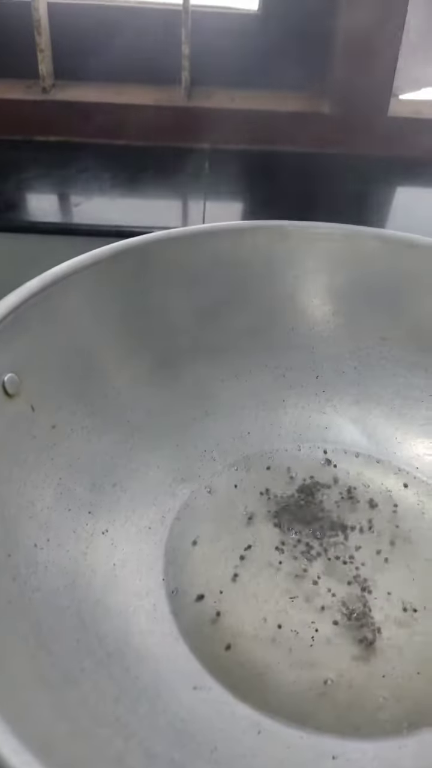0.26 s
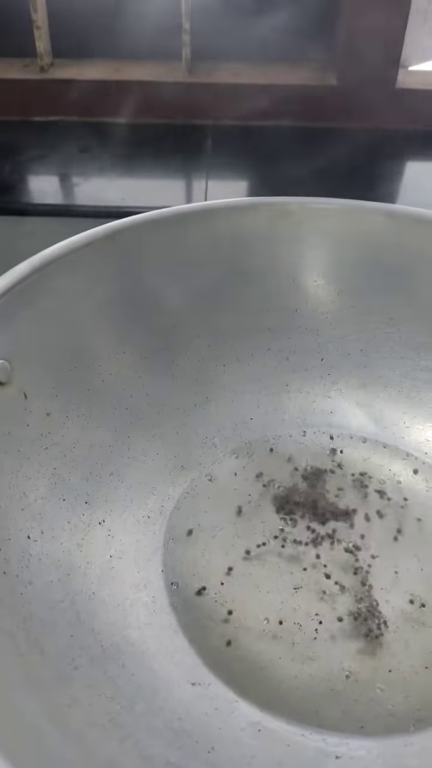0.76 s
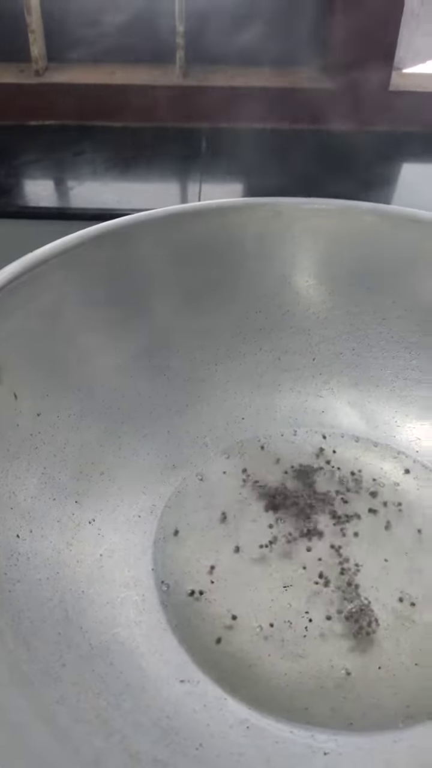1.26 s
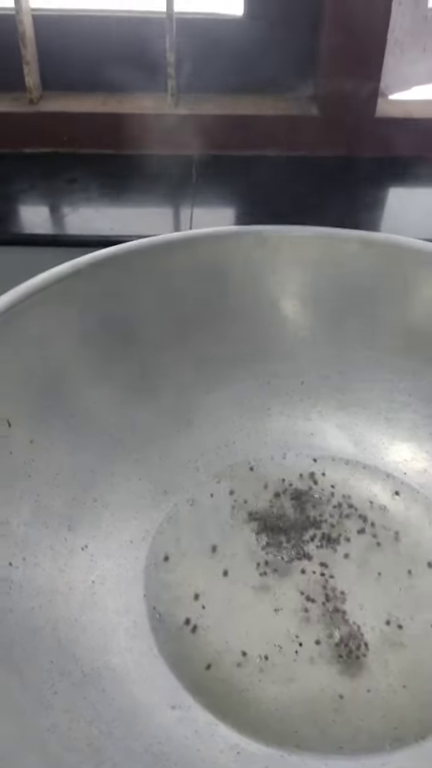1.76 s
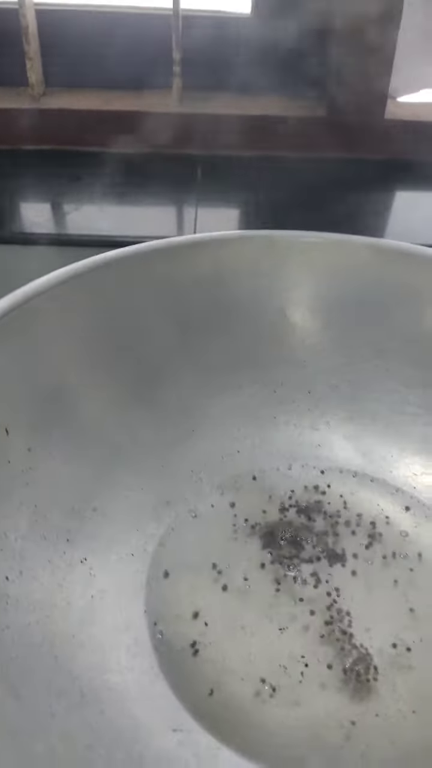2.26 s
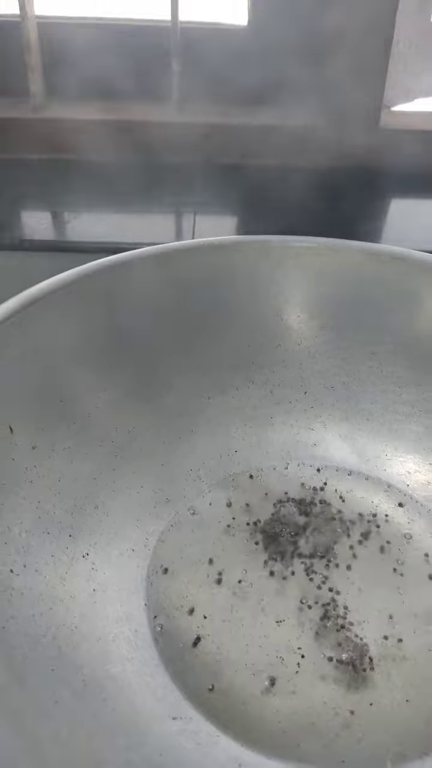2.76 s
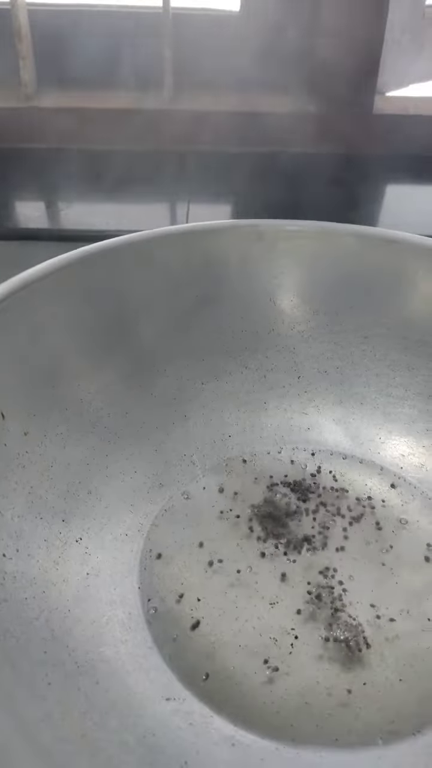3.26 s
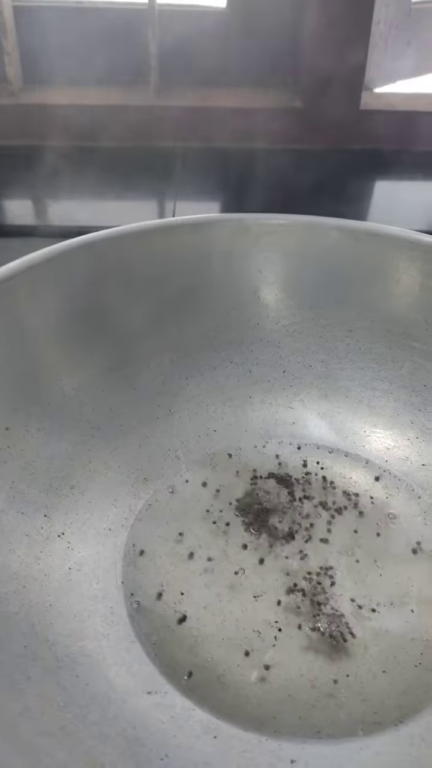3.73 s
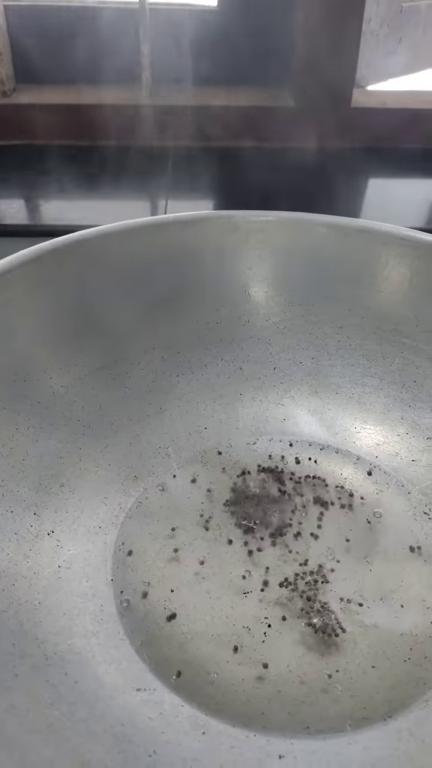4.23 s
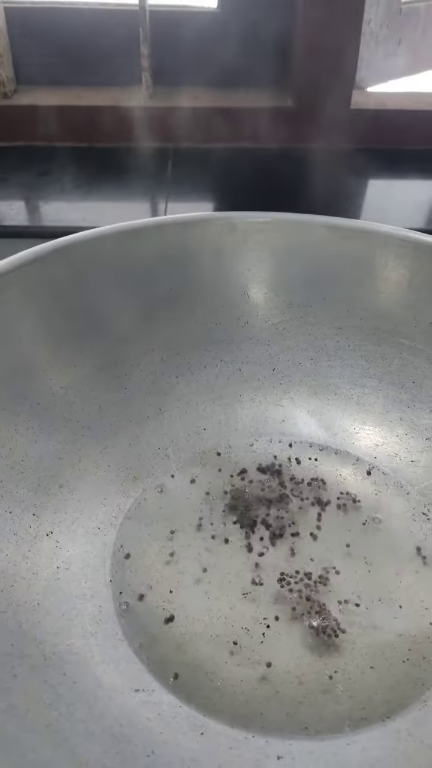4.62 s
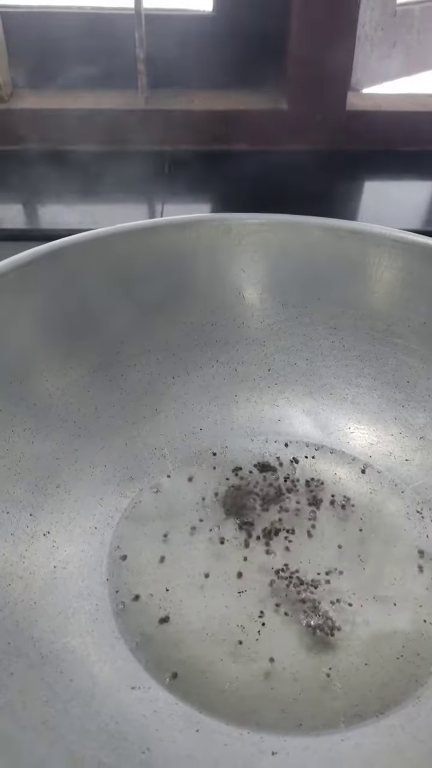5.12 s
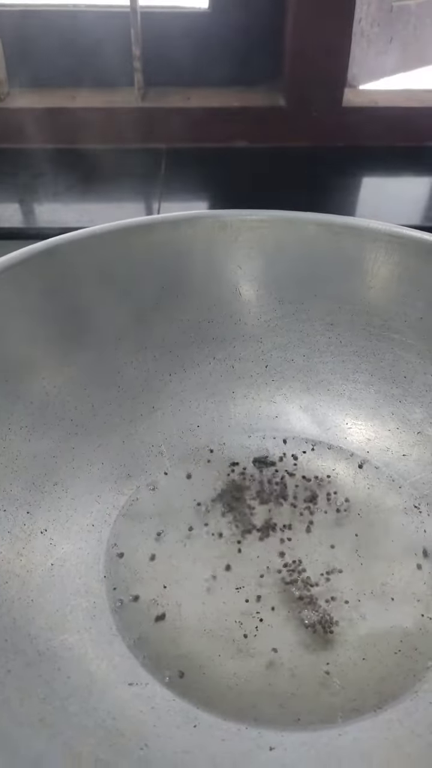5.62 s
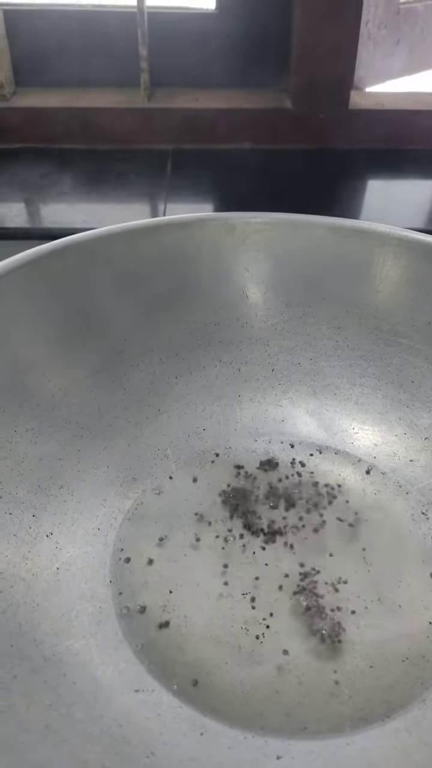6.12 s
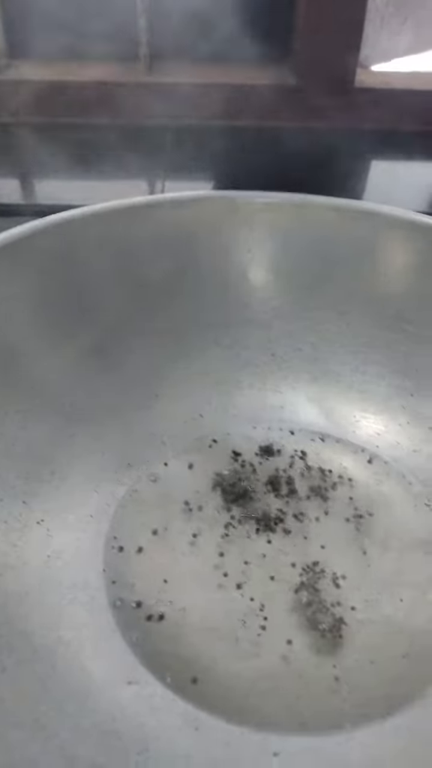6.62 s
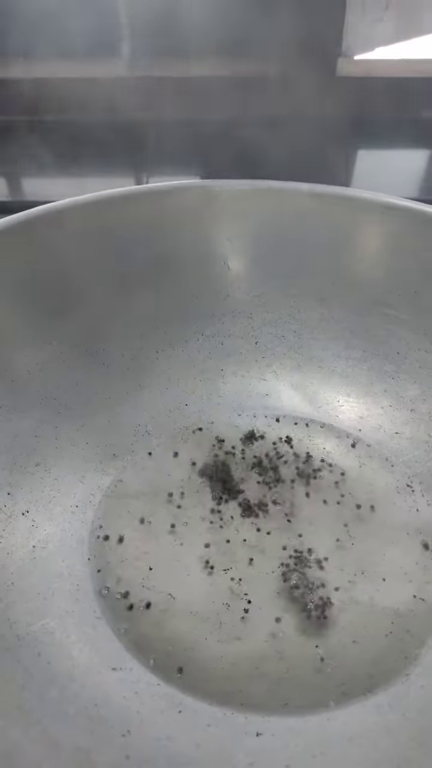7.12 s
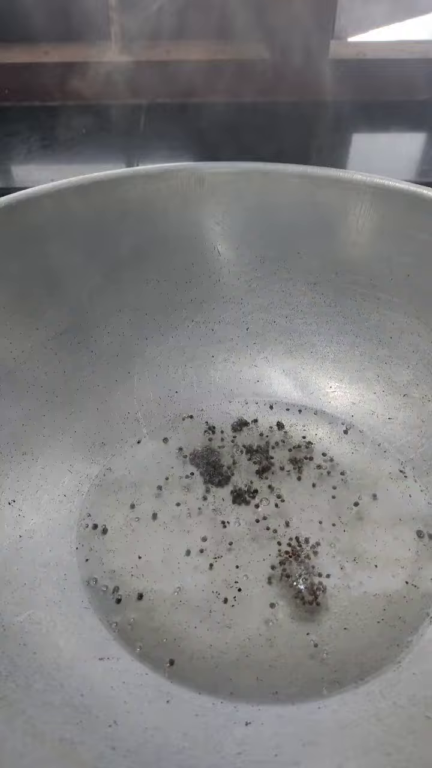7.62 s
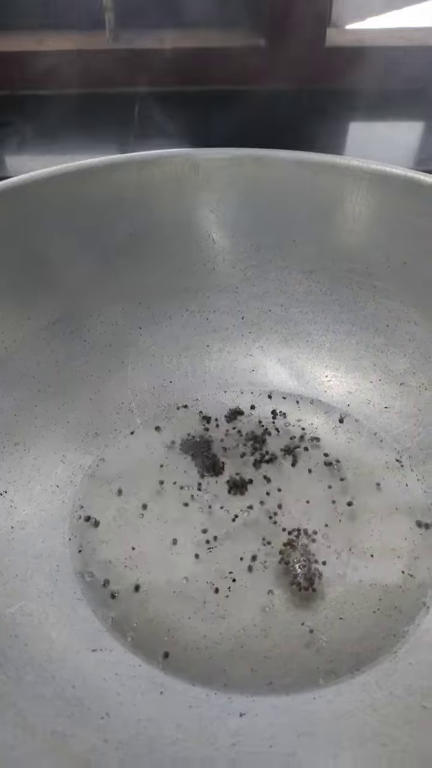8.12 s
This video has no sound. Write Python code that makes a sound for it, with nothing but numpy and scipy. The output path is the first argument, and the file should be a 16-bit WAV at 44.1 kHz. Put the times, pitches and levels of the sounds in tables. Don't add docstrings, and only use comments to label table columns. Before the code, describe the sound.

A quiet gas flame hisses and rumbles while seeds burst in a little hot oil. Dry, bright snaps jump out far above the background, some doubled, some with duller pan knocks, brief steam puffs or fine sizzling sprays. The metal bowl scatters and briefly rings with each crack. After about six and a half seconds the pops thin out, ending with a strong late one. Close stereo phone pickup in a small hard room.

```python
import sys
import numpy as np
from scipy import signal
from scipy.fft import rfft, irfft, next_fast_len
from scipy.io import wavfile
from scipy.ndimage import uniform_filter1d, minimum_filter1d, map_coordinates

SR = 44100
rng = np.random.default_rng(int(sys.argv[2]) if len(sys.argv) > 2 else 0)


def output_pcm(signal):
    pcm = np.clip(np.atleast_2d(signal).T, -1, 1) * 32767
    wavfile.write(sys.argv[1], SR, np.round(pcm).astype(np.int16))


def how_loud(loudness_db):
    steps = np.asarray(loudness_db, float) / 20
    return 10 ** steps


N = 369558

# (frequency [Hz], level per Hz [dB])
SNAP = [(3500, -44), (5200, -3), (6500, -2.5), (7800, 2), (9200, -7), (9700, -19.5), (10300, -27.5),
        (15000, -32.5), (16500, -73.5)]
# (frequency [Hz], level per Hz [dB])
BODY = [(2500, -38), (3500, -4), (4400, 3), (5300, 3.5), (6200, -9), (8000, -47.5)]


def unit(x):
    return x / np.sqrt(np.mean(x ** 2) + 1e-20)


def along(points, hz):
    f, v = np.transpose(points)
    return np.interp(np.log(hz + 1), np.log(f + 1), v)


def wobble(rate):
    knots = rng.standard_normal(int(N * rate / SR) + 4)
    return map_coordinates(knots, [np.arange(N) * rate / SR])


def filtered(x, response):
    m = next_fast_len(x.shape[-1] + 8192)
    return irfft(rfft(x, m) * response(np.fft.rfftfreq(m, 1 / SR)), m)[..., :x.shape[-1]]


def causal(spectrum, size=1024):
    log_gain = np.log(how_loud(along(spectrum, np.fft.rfftfreq(size, 1 / SR))) + 1e-6)
    c = irfft(log_gain, size)
    c = np.concatenate([c[:1], 2 * c[1:size // 2], np.zeros(size // 2)])
    h = irfft(np.exp(rfft(c)), size)[:size // 2]
    return h / np.linalg.norm(h)


def noise_pair(count):
    return rng.standard_normal((2, count))


def bursts():
    # (time [s], snap level [dB], belly beside snap [dB], body beside snap [dB])
    deep_seeds = [(-.06, -9.5, -16.5, -9), (0.1654, -7, -14, -9), (.19, -7.5, -13, -9),
                  (.611, -10, -14, -8.5), (0.9386, -6.5, -12, -7.5), (0.9782, -10, -17, -12.5),
                  (1.066, -4, -18, -8), (1.299, -13.5, -19, -14), (1.3422, -9.5, -10, -12),
                  (2.6652, -5.5, -18.5, -14.5), (2.7581, -6.5, -12.5, -10.5), (3.454, -5.5, -19.5, -10.5),
                  (3.5792, -4, -15, -11.5), (4.1491, -9.5, -11.5, -6), (4.6823, -11, -8, -5.5),
                  (4.9854, -9.5, -16.5, -8), (5.385, -7, -15, -11), (5.4789, -27.5, -17, -10),
                  (5.8074, -6.5, -15, -15.5), (5.895, -5.5, -14.5, -14.5), (6.0996, -5, -21, -15.5),
                  (6.548, -7, -18.5, -13), (6.6262, -5.5, -16, -11.5), (7.0113, -4, -19, -16)]
    # (time [s], snap level [dB], bowl beside snap [dB], body beside snap [dB])
    shallow_seeds = [(0.0433, -15.5, -9, -17), (1.3155, -6, -12.5, -11.5), (1.5047, -6.5, -13, -11),
                     (1.577, -5.5, -16.5, -12.5), (2.003, -8.5, -13, -9.5), (2.1143, -8.5, -8.5, -9.5),
                     (2.1915, -3.5, -16.5, -13.5), (2.3457, -16.5, -19.5, -4.5), (2.4654, -6, -19.5, -9),
                     (2.614, -13, -11, -1.5), (2.658, -16, -10.5, -9), (3.3877, -19.5, -15.5, -6),
                     (3.729, -7.5, -14, -8), (3.9059, -6.5, -13.5, -11), (4.0327, -7.5, -12, -9.5),
                     (4.1163, -6.5, -16.5, -10.5), (5.109, -35.5, -8, 2.5), (5.3422, -9, -13.5, -6.5),
                     (5.5522, -6, -13, -13), (6.5385, -21.5, -12, -12), (7.867, -3, -16, -11)]
    # (time [s], snap level [dB], body beside snap [dB], left over right [dB])
    air_seeds = [
        (0.0459, -6, -6.5, 2),
        (0.8744, -30.5, -16, -10),
        (1.9133, -6.5, -9.5, -1.5),
        (4.1716, -6.5, -19.5, 6),
        (4.464, -7, -9.5, 1.5),
        (4.5055, -10, -10.5, 5),
        (6.417, -28.5, -17, 6),
        (7.776, -16, -14, 0),
    ]
    deep_bowl_db, shallow_belly_db = -4.5, -9
    air_belly_db, air_bowl_db = -31, -27
    left_db = 1.2
    deep = [(s, db, belly, body + deep_bowl_db, body, left_db) for s, db, belly, body in deep_seeds]
    shallow = [(s, db, bowl + shallow_belly_db, bowl, body, left_db) for s, db, bowl, body in shallow_seeds]
    air = [(s, db, air_belly_db, air_bowl_db, body, left) for s, db, body, left in air_seeds]
    return sorted(deep + shallow + air)


def drone():
    # (frequency [Hz], width [Hz], level [dB])
    motor_tones = [(213.7, 6.2, -68), (246, 9, -66), (327, 11, -66), (922, 54, -68)]
    total = 0
    for centre, width, db in motor_tones:
        tone = filtered(rng.standard_normal(N), lambda hz: 1 / (1 + ((hz - centre) / width * 2) ** 2))
        total = total + how_loud(db) * unit(tone)
    return total


def rush(spectrum, patchy_db):
    # (frequency [Hz], likeness [-1 to 1])
    likeness = [(60, 0.64), (180, 0.81), (550, 0.08), (1650, -0.33), (4970, 0.13), (15000, -0.13)]
    z = signal.stft(noise_pair(N), nperseg=512)[2]
    field = uniform_filter1d(rng.standard_normal(z.shape[1:]), 6, 0)
    field = uniform_filter1d(field, 10, 1)
    pair = signal.istft(z * how_loud(patchy_db * unit(field)), nperseg=512)[1][:, :N]

    def spread(hz):
        turn = np.arccos(np.clip(along(likeness, hz), -1, 1)) / 2
        return how_loud(along(spectrum, hz)) * [np.cos(turn), np.sin(turn)]

    mid, side = filtered(pair, spread)
    return unit(np.array([mid + side, mid - side]))


def flame():
    # (frequency [Hz], level per Hz [dB])
    hiss_colour = [(650, -3.5), (1100, -11), (1560, -13), (1690, -11.5), (1770, -13), (3160, -14),
                   (4280, -9), (5560, -7), (7810, 4), (11200, -18), (14700, -22), (15900, -30),
                   (16500, -46)]
    # (frequency [Hz], level per Hz [dB])
    rumble_colour = [(12, -42), (20, 14), (43, 1), (91, -9.5), (160, -15), (202, 1.5), (288, -19.5),
                     (418, -1.5), (449, -25), (473, -17.5), (700, -7.5), (851, -21), (930, -5.5),
                     (1030, -11.5), (1400, -29), (1820, -22), (3080, -120)]
    calm_db, stir_db, settle_s, sag_db_per_s, rumble_db = -47.5, 1.3, 0.28, 0.12, -51.5
    t = np.arange(N) / SR
    stir = sum(how_loud(p[1] + 4.5) * np.exp(-np.abs(t - p[0]) / settle_s) * (t > p[0]) for p in bursts())
    hiss_db = calm_db + stir_db * uniform_filter1d(stir, SR // 10) - sag_db_per_s * t
    hiss = how_loud(hiss_db + 6 + 1.23 * wobble(6)) * rush(hiss_colour, patchy_db=2.0)
    rumble = how_loud(rumble_db + 1.1 + 0.11 * wobble(1.7)) * rush(rumble_colour, patchy_db=-0.1)
    return hiss + rumble


def extras():
    # (end time [s], level [dB], rise by 60 dB [s])
    vents = [
        (1.299, -34, 0.11),
        (2.194, -37, .03),
        (4.116, -32, .025),
        (4.173, -7.5, 0.019),
        (4.507, -23, 0.024),
        (7.009, -43, 0.034),
        (0.167, -27, .02),
    ]
    # (time [s], level [dB])
    splinters = [(0.979, -21), (1.067, -19), (1.344, -2.5), (3.7298, -11), (3.907, -9), (4.0331, -5),
                 (4.1735, -16), (4.507, -6), (4.6841, -2.5), (4.9871, -4), (5.3418, -7), (6.551, -20)]
    # (time [s], peak level [dB])
    thumps = [
        (2.759, -43),
        (3.455, -40),
        (5.385, -37),
        (5.553, -37.5),
        (5.809, -33.5),
        (7.87, -37),
    ]
    # (frequency [Hz], level per Hz [dB])
    thud = [(80, -61), (220, 2), (500, 9), (900, 7.5), (1300, -16), (2500, -67)]
    bright, dull = np.zeros((2, N)), np.zeros((2, N))
    t = np.arange(SR // 10) / SR
    for s, db, t60 in vents:
        end = round(s * SR)
        bright[:, end - len(t):end] += how_loud(db - 60 * t[::-1] / t60) * noise_pair(len(t))
    for s, db in splinters:
        bright[[0, 1], round(s * SR) + np.array([9, 0])] += how_loud(db + 15)
    kicks = [(p[0], p[1] + p[2] - 19) for p in bursts()[1:]]
    for s, db in thumps + kicks:
        dull[:, round(s * SR):][:, :len(t)] += how_loud(db - 1.0 - 60 * t / 0.1) * noise_pair(len(t))
    splinter_colour = causal(SNAP) + 0.55 * causal(BODY)
    bright = signal.fftconvolve(bright, splinter_colour[None], axes=1)[:, :N]
    return bright + signal.fftconvolve(dull, causal(thud)[None], axes=1)[:, :N]


def sprays():
    # (time [s], peak level [dB])
    fine_sprays = [(0.044, -22), (.19, -46), (.9393, -41), (1.3149, -29), (2.7571, -22), (3.5793, -17.5),
                   (4.15, -30.5), (4.5186, -12), (5.806, -21), (5.8936, -20), (6.0983, -19.5), (7.011, -19),
                   (7.869, -21)]
    # (time [s], peak level [dB])
    droplets = [
        (1.5778, -37),
        (2.3448, -9.5),
        (3.454, -9.5),
        (3.9068, -0.5),
        (4.5057, 0),
        (5.3842, -20),
        (6.5495, -2),
    ]
    # (frequency [Hz], level per Hz [dB])
    spit_colour = [(7500, -13), (9800, 9.5), (12000, -0.5), (15000, -13), (15900, -25), (16600, -67)]
    spray_t60_s, spit_t60_s = 0.24, 0.011
    out, t = np.zeros((2, N + SR)), np.arange(SR // 5) / SR
    ticks = [(p[0], p[1] - 33 + rng.normal(0, 4)) for p in bursts()[1:]]
    events = [(*p, spray_t60_s) for p in fine_sprays] + [(*p, spit_t60_s) for p in droplets + ticks]
    for s, db, t60 in events:
        out[:, round(s * SR):][:, :len(t)] += how_loud(db - 10.5 - 60 * t / t60) * noise_pair(len(t))
    return signal.fftconvolve(out, causal(spit_colour)[None], axes=1)[:, :N]


def fizz(t, lead):
    rise = how_loud(rng.normal(-18, 4) - 60 * (lead - t) / .007)
    return noise_pair(len(t)) * (t < lead) * rise


def bounce(t, spike_db):
    glints = noise_pair(len(t)) * how_loud(spike_db * noise_pair(len(t)))
    fill = how_loud(-1.0) * (1 - np.exp(-t / 0.00038))
    direct = rng.standard_normal(len(t)) * how_loud(7.5 - 60 * t / 0.0041) * (1 - np.exp(-t / 0.00031))
    pair = np.array([np.roll(direct, 18), direct])
    flutter = how_loud(-60 * t / 0.038) + how_loud(-10.5 - 60 * t / .12)
    return pair + unit(glints) * fill * flutter


def kitchen(t):
    # (frequency [Hz], fall by 60 dB [s])
    echo_times = [(1000, 0.55), (2500, 0.58), (7000, 0.47), (14000, 0.37)]
    hz, s, z = signal.stft(noise_pair(len(t)), SR, nperseg=256)
    fade = how_loud(-60 * s / along(echo_times, hz)[:, None])
    tail = signal.istft(z * fade, SR, nperseg=256)[1][:, :len(t)]
    late = 1 + 0.36 / (1 + np.exp(-(t - .11) / 0.01))
    return tail * late * (1 - np.exp(-t / 0.013))


def ring(t, belly_db, bowl_db):
    # (frequency [Hz], level [dB], fall by 60 dB [s])
    wall_tones = [(786, -22, 0.2), (1480, -8.5, 0.19), (1692, -9.5, 0.34), (1626, -3, 0.22),
                  (1740, -41, 0.097), (1960, -28, 0.22), (2040, -7, 0.29), (2118, -5, 0.31),
                  (2474, -2.5, 0.21), (2600, -17, 0.1), (2960, -5.5, 0.25), (3044, -17, 0.4)]
    hz, db, t60 = np.transpose(wall_tones)[:, :, None]
    db = db + np.where(hz < 2250, belly_db, bowl_db) + 3 * rng.standard_normal((2, len(wall_tones), 1))
    detuned_hz = hz * (1 + 0.00785 * rng.standard_normal(hz.shape))
    turns = detuned_hz * t + rng.random((2, len(wall_tones), 1))
    tones = how_loud(db - 60 * t / t60) * np.sin(2 * np.pi * turns)
    return np.sum(tones, axis=1) * (1 - np.exp(-t / 0.00042))


def pops():
    # (frequency [Hz], level per Hz [dB])
    belly_colour = [(300, -58), (700, -26), (1100, -15.5), (1350, -16.5), (1650, 2), (2100, 3),
                    (2500, -6.5), (3500, -64.5)]
    # (frequency [Hz], level per Hz [dB])
    bowl_colour = [(1500, -36), (2200, -8), (2500, -1.5), (2900, -0.5), (3400, -6), (4500, -53.5)]
    lead, size = 300, 18000
    out, t = np.zeros((2, N + 2 * SR)), np.arange(size) / SR
    burst = t >= lead / SR
    snap, belly, bowl, body = (causal(c) for c in (SNAP, belly_colour, bowl_colour, BODY))
    for s, db, belly_db, bowl_db, body_db, left_db in bursts():
        low = how_loud(belly_db + 9) * belly + how_loud(bowl_db + 7) * bowl
        colour = snap + how_loud(body_db + 7) * body + np.roll(low, round(0.001585 * SR))
        path = bounce(t, spike_db=2.5) + how_loud(-16.5) * kitchen(t)
        path = np.roll(path, lead, axis=1) * burst + fizz(t, lead / SR)
        pop = signal.fftconvolve(path, colour[None], axes=1)[:, :size]
        pop = pop + how_loud(-2.0) * np.roll(ring(t, belly_db, bowl_db), lead, axis=1) * burst
        sides = how_loud([[left_db / 2], [-left_db / 2]])
        out[:, SR + round(s * SR) - lead:][:, :size] += how_loud(db - 3.5) * sides * pop
    return out[:, SR:SR + N]


def scene():
    return pops() + sprays() + extras() + flame() + drone()


def band_limit(x):
    return signal.sosfilt(signal.butter(12, 16400, fs=SR, output="sos"), x)


def record(dry):
    # (frequency [Hz], level [dB])
    low_cut = [(25, -11.5), (100, -10), (200, -1.5), (260, -3), (500, -3.5), (750, -1), (900, 0)]
    # (frequency [Hz], left over right [dB])
    lean = [(60, 5.5), (92, 2), (140, 6), (210, 4), (330, 8.5), (500, 0), (770, 5.5), (1170, 2.5),
            (1790, 0), (2740, -2.5), (4190, 0.0), (6410, -6.5), (9810, 1.0), (15000, 0)]
    sides = np.array([[1], [-1]])
    x = filtered(dry, lambda hz: how_loud(along(low_cut, hz) + along(lean, hz) / 2 * sides))
    need_db = -3.5 * np.clip(np.abs(x).max(0) / 0.26, 0, 1)
    ahead, hold, release = round(0.0097 * SR), round(.1 * SR), round(0.01 * SR)
    held = minimum_filter1d(np.pad(need_db, (hold // 2 - ahead, ahead)), hold)[:N]
    creep = uniform_filter1d(np.pad(held, (release // 2, 0)), release)[:N]
    x = x * how_loud(uniform_filter1d(np.minimum(held, creep), 120))
    x = x / (1 + np.abs(x / .95) ** 4) ** (1 / 4)
    return band_limit(x)


dry = scene()
out = record(dry)
output_pcm(out)
```